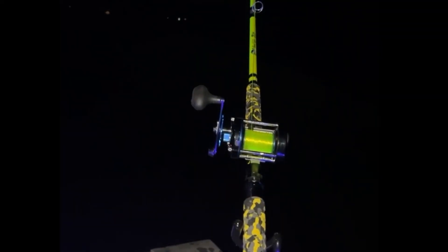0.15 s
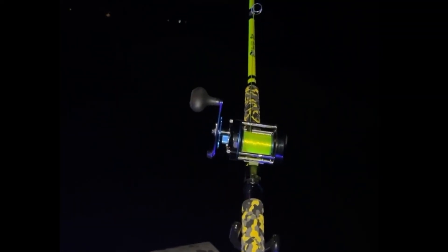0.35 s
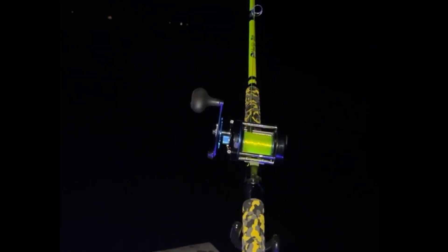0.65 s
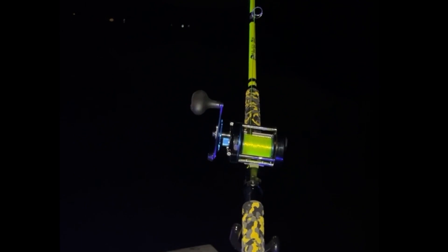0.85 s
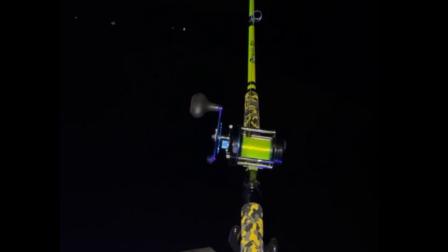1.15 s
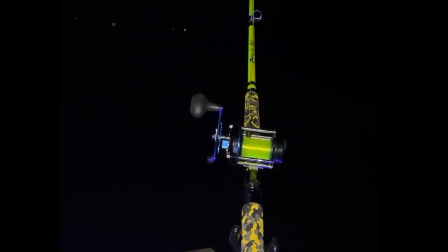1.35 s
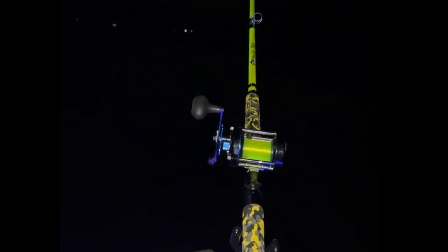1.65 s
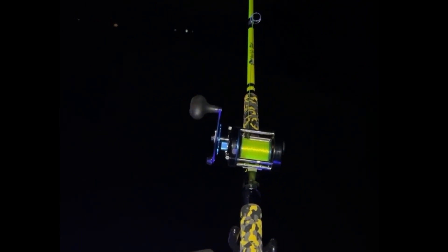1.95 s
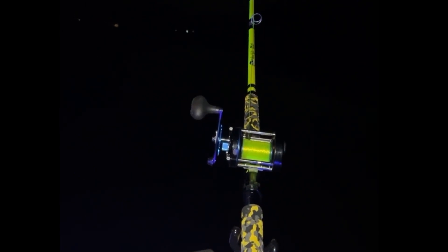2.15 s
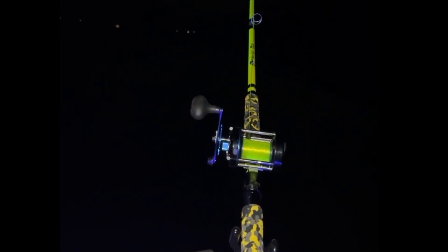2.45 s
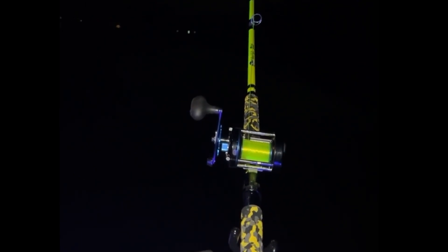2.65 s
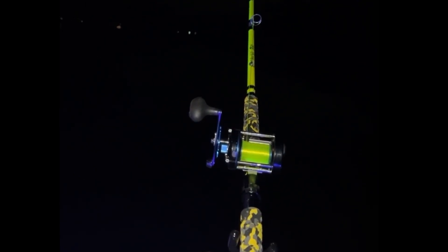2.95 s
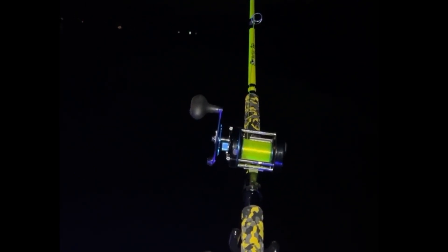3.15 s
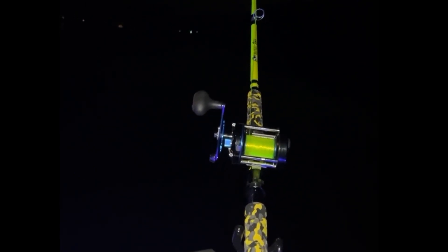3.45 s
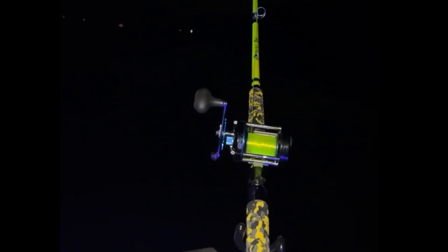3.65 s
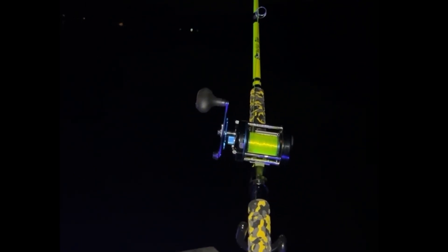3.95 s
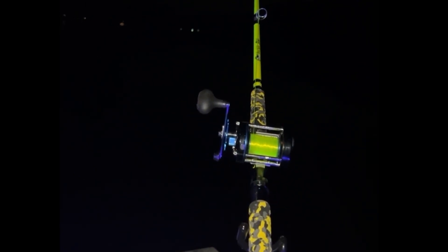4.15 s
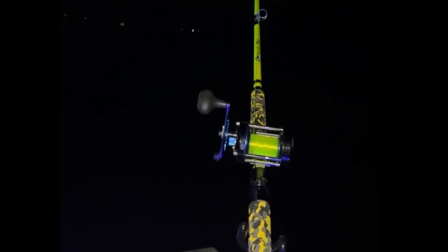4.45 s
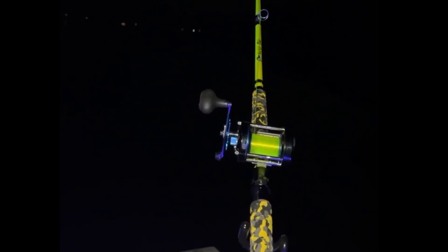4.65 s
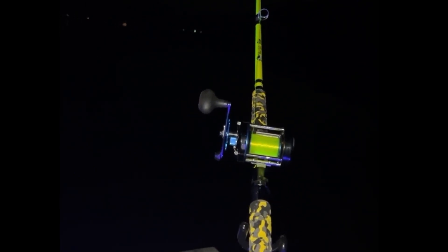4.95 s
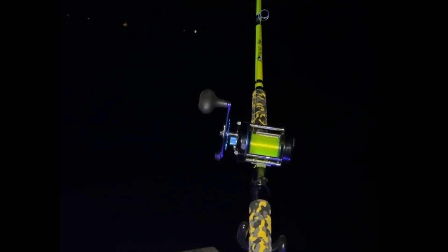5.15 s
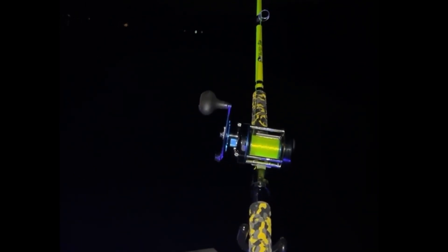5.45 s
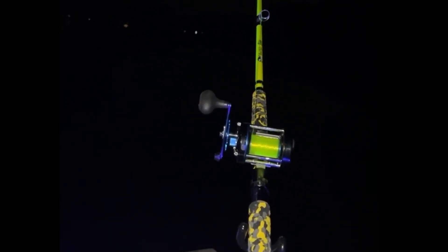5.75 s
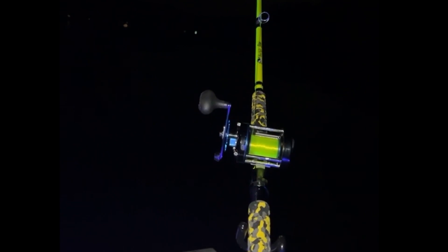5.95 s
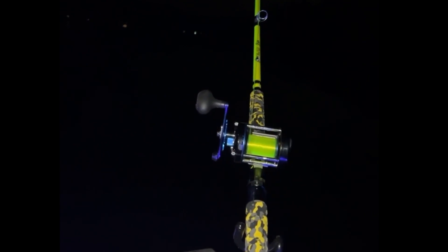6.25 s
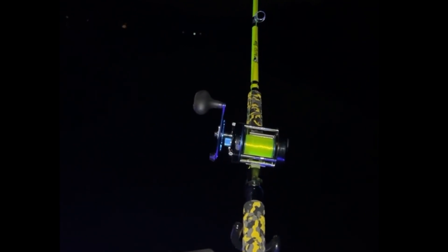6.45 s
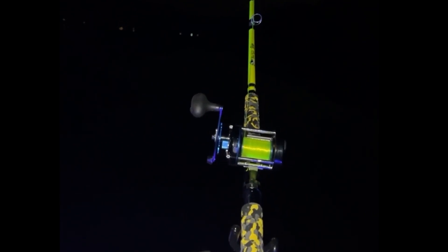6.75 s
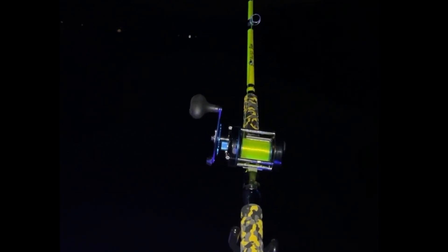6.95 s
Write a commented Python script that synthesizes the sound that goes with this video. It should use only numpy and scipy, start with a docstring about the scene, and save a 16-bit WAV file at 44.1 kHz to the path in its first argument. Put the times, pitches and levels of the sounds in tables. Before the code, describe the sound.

A small pump motor buzzes and hisses steadily over low night rumble and faint mains hum. After one second a fishing reel's clicker ratchets in five short runs with pauses between, each a string of crisp metallic snaps that speeds up and slows. Faint ticks fall between snaps, and soft low wind puffs brush the microphone. Close, dry, outdoors, single microphone.

```python
"""A small pump motor buzzes and hisses over low rumble and a mains hum, outdoors at night; after a second
a fishing reel's clicker ratchets in five short runs as line is pulled off the spool.
A spring pawl snaps off nine teeth in turn, rings the reel's parts as decaying modes and echoes off the frame.
The motor is a sum of shaft orders plus pulsing noise; filtered noise makes the rumble and the puffs of wind."""
import sys
import numpy as np
from scipy import signal
from scipy.fft import rfft, irfft, next_fast_len
from scipy.io import wavfile
from scipy.ndimage import uniform_filter1d

SR = 44100
rng = np.random.default_rng(int(sys.argv[2]) if len(sys.argv) > 2 else 0)


def generate_wav(sig):
    """Save sig (samples, or channels by samples) to the path in sys.argv[1] as 16-bit PCM at SR."""
    pcm = np.round(np.clip(np.atleast_2d(sig).T, -1, 1) * 32767).astype(np.int16)
    wavfile.write(sys.argv[1], SR, pcm)


def decibels_to_gain(level_db):
    """Convert a level in decibels to a linear amplitude gain (20 dB per decade)."""
    exponent = np.asarray(level_db, float) / 20
    return 10 ** exponent


N = 313110

# Pawl snaps, one per passing tooth: time_s
SNAP_TIMES = [1.1066, 1.166, 1.2193, 1.2607, 1.2977, 1.3356, 1.383, 1.4832, 2.6606, 2.7025, 2.7369, 2.7733,
              2.8107, 2.8486, 2.889, 2.9294, 2.9664, 3.0038, 3.0437, 3.0866, 3.1305, 3.1744, 3.2188, 3.2647,
              3.3131, 3.363, 3.4253, 4.5977, 4.6366, 4.666, 4.6934, 4.7199, 4.7463, 4.7723, 4.7987, 4.8276,
              4.8621, 4.9089, 5.8698, 5.9296, 5.996, 6.0409, 6.0763, 6.1062, 6.1357, 6.1651, 6.197, 6.2309,
              6.2689, 6.3172, 6.8974, 6.9413, 6.9792, 7.0211]
# Offsets for each of the nine teeth: rod_db, rod_top_db, plate_db, pawl_db, frame_db
TOOTH_OFFSETS = [(-.7, 2, 1, -.4, .3), (.7, -2, 0, -1.5, 0), (1.4, -5, -.6, -.5, -.4), (0, 1, -1.6, 1.8, 0),
                 (0, 4, .4, .4, .4), (0, 0, 1, .4, -.3), (.4, -2, 1.1, -1, -1), (-.4, -2, -1.4, -.6, .5),
                 (-1, 2.5, -.3, 1.2, .4)]
# Modes of the rod seat, top mode last: freq_hz, level_db, t60_s
ROD_MODES = [(840, -11, .05), (1080, -4, .06), (1500, -1, .075), (2050, 0, .085), (2420, -8, .04),
             (2770, 1, .035)]
# Modes of the side plate: freq_hz, level_db, t60_s
PLATE_MODES = [(3725, -2, 0.015), (3986, -0.5, 0.016), (4130, -1, 0.011), (4568, -1.5, 0.013),
               (4750, 0, 0.014), (5400, -3, 0.024)]
# Modes of the pawl: freq_hz, level_db, t60_s
PAWL_MODES = [(8670, -7.5, 0.013), (8960, -1, 0.014), (9180, 1, 0.0088), (9500, -4.5, 0.012),
              (9650, -4, 0.01), (9000, -9, 0.021)]
# Modes of the frame: freq_hz, level_db, t60_s
FRAME_MODES = [(5610, -3, .013), (6090, -2, .016), (6420, -2, .018), (6950, -4, .016), (7220, 0, .018),
               (7950, -3, .016), (10700, -3, .015), (11300, 0, .012), (11900, -1, .012), (12350, -2, .012),
               (13400, -6, .012), (14150, -6, .013), (14720, -7, .013), (15250, -4, .013),
               (15600, -7, .012)]
# Loose parts rattling after a snap, relative spectrum: freq_hz, density_db
RATTLE_SPECTRUM = [(2500, -31), (3300, -8.5), (3600, -1), (4300, -2), (5500, -6), (7600, -1), (9000, -10),
                   (10400, -14), (15500, -10), (17000, -23)]
# Rod holder shudder, relative spectrum: freq_hz, density_db
SHUDDER_SPECTRUM = [(650, -26), (800, -5.5), (1100, -5.5), (1500, -2.5), (2050, -5), (2500, -1.5),
                    (3400, -19)]
# Pawl touching the next tooth, spool slow or stopping: time_s, level_db, thin_ring_share (0-1)
SLOW_TOUCHES = [(1.020, -57, .3), (1.418, -56, 1), (1.538, -53, 1), (1.958, -47, .15), (3.472, -54, 1),
                (4.498, -60, .8), (4.944, -55, 1), (6.357, -53, 1), (7.056, -54, 1)]
# Pump motor speed, sagging under load: time_s, speed_turns_per_s
MOTOR_SPEED = [(0, 51.23), (2.4, 51.23), (2.9, 51.12), (3.4, 51.23), (3.7, 50.95), (5.7, 51.0),
               (6.4, 51.22), (7.1, 51.2)]
# Motor shaft orders from the eighth upward: rms_db
SHAFT_ORDERS_DB = [-75, -84, -78, -73, -74, -80, -85, -82, -84, -84, -79, -79, -72, -82, -90, -81, -77, -77,
                   -72, -68, -84, -75, -83, -73, -76, -74, -69, -77, -64, -62, -69, -69, -77, -69, -70, -80,
                   -82, -84, -84, -84, -85, -82, -80, -85, -84, -81, -84, -83, -80, -85, -82]
# Pump hiss, relative spectrum: freq_hz, density_db
HISS_SPECTRUM = [(380, -30.5), (650, -19), (841, -15.5), (1020, -17), (1150, -15.5), (1350, -11),
                 (1570, -11.5), (1890, -4), (2380, -11), (3390, -12), (3880, -9.5), (4320, -13.5),
                 (7430, -32.5), (13500, -37), (16500, -60)]
# Pump housing peaks and dips: freq_hz, width_hz, gain_db
HOUSING_PEAKS = [(2150, 140, 4), (3820, 220, 5), (6500, 560, 7), (1380, 150, -4), (10550, 1300, -5.5),
                 (13400, 1300, 7)]
# Puffs of wind on the microphone: start_s, hold_s, level_db
WIND_PUFFS = [(2.438, .12, -36), (5.42, 0.12, -45), (5.587, .04, -39.5), (6.878, 0.024, -43.5),
              (7.031, 0.038, -34.5)]
# Wind, relative spectrum: freq_hz, density_db
WIND_SPECTRUM = [(12, -21), (20, -20.5), (48, 4), (72, -1), (113, -14), (146, -13.5), (250, -27.5),
                 (320, -33), (550, -120)]
# Night rumble, relative spectrum: freq_hz, density_db
RUMBLE_SPECTRUM = [(12, -58.5), (20, -30.5), (55, 0), (93, -1.5), (123, -6.5), (147, -7), (233, -18),
                   (304, -18), (343, -22), (568, -27.5), (700, -37), (910, -59), (1540, -120)]

ROD_DB, ROD_TOP_DB, PLATE_DB, PAWL_DB, FRAME_DB = -45.5, -45, -29, -26.5, -31  # before tooth offsets
RATTLE_GAIN_DB, SHUDDER_GAIN_DB, CRACK_GAIN_DB = -37.5, -43, -27
TOOTH_SHARE = .7  # part of a blow's scatter variance that returns with its tooth
LANDING_DELAY_S = .0005  # from letting go to landing
SLIP_S, SLIP_END_DB = .0012, -56
ECHO_S, ECHO_DB = .00205, -4
FAR_ECHO_S, FAR_ECHO_DB = .0135, -36  # hard surface a few steps away
TOUCH_GAP_SHARE, TOUCH_DB = .6, -58.5  # inside a run: share of the gap to the next snap
HISS_DB, RUMBLE_DB = -57, -47
HUM_HZ, HUM_PEAK_DB = 119.9, -49.5
PUFF_RISE_S, PUFF_FALL_DB_PER_S = .022, 243


def evened(x):
    """Scales to rms 1."""
    return x / np.sqrt(np.mean(x ** 2) + 1e-20)


def read(points, hz):
    """Reads a spectrum on a log-frequency axis."""
    freq_hz, value = np.transpose(points)
    return np.interp(np.log(hz + 1), np.log(freq_hz + 1), value)


def add(mix, start_s, sound):
    """Mixes a sound in at start_s."""
    part = mix[round(start_s * SR):][:len(sound)]
    part += sound[:len(part)]


def noise(shape_db):
    """Noise of rms 1 whose spectrum is shape_db(Hz)."""
    size = next_fast_len(N)
    hz = np.fft.rfftfreq(size, 1 / SR)
    spectrum = rfft(rng.standard_normal(size)) * decibels_to_gain(shape_db(hz))
    return evened(irfft(spectrum, size)[:N])


def wander(rate_hz):
    """Slow random drift of rms 1."""
    return noise(lambda hz: -40 * np.log10(1 + hz / rate_hz))


def ring(modes, phases, chance, scatter_db, detune, phase_spread):
    """One blow as a sum of decaying modes, scaled to the energy of 5 ms at rms 1; blows vary by chance."""
    hz, level_db, t60_s = np.transpose(modes)[:, :, None]
    level_dice, pitch_dice, phase_dice = chance[:, :len(modes), None]
    t = np.arange(4000) / SR
    angle = 2 * np.pi * hz * (1 + detune * pitch_dice) * t
    angle = angle + phases[:len(modes), None] + phase_spread * phase_dice
    decay = decibels_to_gain(level_db + scatter_db * level_dice - 60 * t / t60_s)
    sound = (decay * np.sin(angle)).sum(0)
    return sound / np.sqrt(np.sum(sound ** 2) / (SR / 200))


def snaps():
    """The pawl scrapes off a tooth and lands: crack, four ringing parts, rattle, shudder and two echoes."""
    out, t = np.zeros(N), np.arange(4000) / SR
    count = len(SNAP_TIMES)
    tooth = np.arange(count) % len(TOOTH_OFFSETS)
    phases = .5 * rng.standard_normal((5, 15))
    dice = rng.standard_normal((count, 2, 5, 3, 15))
    chance = np.sqrt(TOOTH_SHARE) * dice[tooth, 0] + np.sqrt(1 - TOOTH_SHARE) * dice[:, 1]
    rattle = noise(lambda hz: read(RATTLE_SPECTRUM, hz))
    shudder = noise(lambda hz: read(SHUDDER_SPECTRUM, hz))
    cracks = np.diff(rng.standard_normal((count, 4002)), n=2, axis=1)
    rise = (1 - np.exp(-t / .0002)) ** 2
    usual_db = np.array([ROD_DB, ROD_TOP_DB, PLATE_DB, PAWL_DB, FRAME_DB])
    mode_sets = ROD_MODES[:-1], ROD_MODES[-1:], PLATE_MODES, PAWL_MODES, FRAME_MODES
    for k, snap_s in enumerate(SNAP_TIMES):
        offset_db = TOOTH_OFFSETS[tooth[k]]
        rod, rod_top, plate, pawl, frame = (
            decibels_to_gain(db) * ring(modes, phase, part_chance, 1.5, .005, .45)
            for db, modes, phase, part_chance in zip(usual_db + offset_db, mode_sets, phases, chance[k]))

        # a tooth shakes the loose parts much the same way each turn
        own = slice(4000 * tooth[k], 4000 * (tooth[k] + 1))
        fresh_start = 4000 * (k + len(TOOTH_OFFSETS))
        fresh = slice(fresh_start, fresh_start + 4000)
        loose = 1.8 * rattle[own] + .87 * rattle[fresh]
        loose = loose * decibels_to_gain(RATTLE_GAIN_DB - 60 * t / .026)
        low = .67 * shudder[own] + .81 * shudder[fresh]
        low = low * decibels_to_gain(SHUDDER_GAIN_DB + offset_db[0] - 60 * t / .07)
        crack = cracks[k] * decibels_to_gain(CRACK_GAIN_DB - 60 * t / .0042)
        bright = (plate + frame + loose + crack) * rise

        land_s = snap_s + LANDING_DELAY_S
        scrape = decibels_to_gain(SLIP_END_DB) * rattle[fresh] * (t / SLIP_S) * (t < SLIP_S)
        add(out, land_s - SLIP_S, scrape)
        add(out, land_s, bright + (pawl + rod + rod_top + low) * rise)
        # frame echo: inverted and duller
        add(out, land_s + ECHO_S, -decibels_to_gain(ECHO_DB) * uniform_filter1d(bright, size=5))
        add(out, land_s + FAR_ECHO_S, decibels_to_gain(FAR_ECHO_DB) * (bright + pawl * rise))
    return out


def touches():
    """The pawl meets the next tooth: a faint noise tick and a thin decaying 7 kHz ring."""
    out, t, snap_s = np.zeros(N), np.arange(1300) / SR, np.array(SNAP_TIMES)
    gaps_s = np.diff(snap_s)
    run_touches_s = (snap_s[:-1] + TOUCH_GAP_SHARE * gaps_s)[gaps_s < .08]
    rows = [(at_s, TOUCH_DB, 1) for at_s in run_touches_s] + list(SLOW_TOUCHES)
    thin = np.sin(2 * np.pi * 7000 * t) * decibels_to_gain(-60 * t / .034) * (1 - np.exp(-t / .00033))
    for (at_s, level_db, ring_share), dice in zip(rows, rng.standard_normal((len(rows), 1302))):
        tick = np.diff(dice[1:]) * decibels_to_gain(-8 - 60 * t / .014)
        add(out, at_s, decibels_to_gain(level_db + 1.5 * dice[0]) * (ring_share * thin + tick))
    return out


def pump():
    """Motor shaft orders follow the speed; the housing-coloured hiss pulses twice per turn."""
    t = np.arange(N) / SR
    speed = np.interp(t, *np.transpose(MOTOR_SPEED)) + .05 * wander(3.0)
    turns = np.cumsum(speed) / SR
    shaft = np.exp(2j * np.pi * turns)
    order, buzz = shaft ** 7, np.zeros(N)
    for rms_db, phase_turns in zip(SHAFT_ORDERS_DB, rng.random(len(SHAFT_ORDERS_DB))):
        order = order * shaft
        buzz += np.sqrt(2) * decibels_to_gain(rms_db) * (order * np.exp(2j * np.pi * phase_turns)).real
    beat = .68 + np.exp(-(turns % 1) / .073) + .2 * np.exp(-((turns - .45) % 1) / .038)

    def hiss_shape(hz):
        """Hiss spectrum with the housing's peaks and dips, dB."""
        housing = sum(db / (1 + (2 * (hz - f) / width) ** 2) for f, width, db in HOUSING_PEAKS)
        return read(HISS_SPECTRUM, hz) + housing

    hiss = decibels_to_gain(HISS_DB + .26 * wander(.5)) * evened(beat) * noise(hiss_shape)
    return decibels_to_gain(.68 * wander(2.1)) * buzz + hiss


def wind():
    """Low, lumpy pressure noise: each puff rises quickly, holds and dies away."""
    t, level = np.arange(N) / SR, np.zeros(N)
    for start_s, hold_s, level_db in WIND_PUFFS:
        since_s = t - start_s
        after_s = np.maximum(since_s - PUFF_RISE_S - hold_s, 0)
        rise = np.clip(since_s / PUFF_RISE_S, 0, 1) ** 2
        level += rise * decibels_to_gain(level_db - PUFF_FALL_DB_PER_S * after_s)
    return level * noise(lambda hz: read(WIND_SPECTRUM, hz))


def rumble():
    """Low night noise that swells a little."""
    return decibels_to_gain(RUMBLE_DB + .43 * wander(4.5)) * noise(lambda hz: read(RUMBLE_SPECTRUM, hz))


def hum():
    """Mains hum: one sine wavering in pitch and level."""
    phase = 2 * np.pi * np.cumsum(HUM_HZ + .5 * wander(1.93)) / SR
    return np.sin(phase) * decibels_to_gain(HUM_PEAK_DB + .83 * wander(3.3))


def scene():
    """All sources at one microphone."""
    return (snaps() + touches() + pump() + wind() + rumble() + hum())[None]


def top_cut(x):
    """Nothing passes above the cut-off."""
    return signal.sosfilt(signal.butter(12, 17030, fs=SR, output="sos"), x)


def record(dry):
    """The microphone chain steps down above 15.7 kHz and again, steeply, above 16.55 kHz."""
    hz = np.fft.rfftfreq(N, 1 / SR)

    def step(edge_hz, width_hz):
        """Smooth 0-1 step in frequency."""
        return (1 + np.tanh((hz - edge_hz) / width_hz)) / 2

    response_db = -9 * step(15700, 150) - 25 * step(16550, 120)
    heard = irfft(rfft(dry) * decibels_to_gain(response_db), N)
    return top_cut(heard)


dry = scene()
out = record(dry)
generate_wav(out)
```